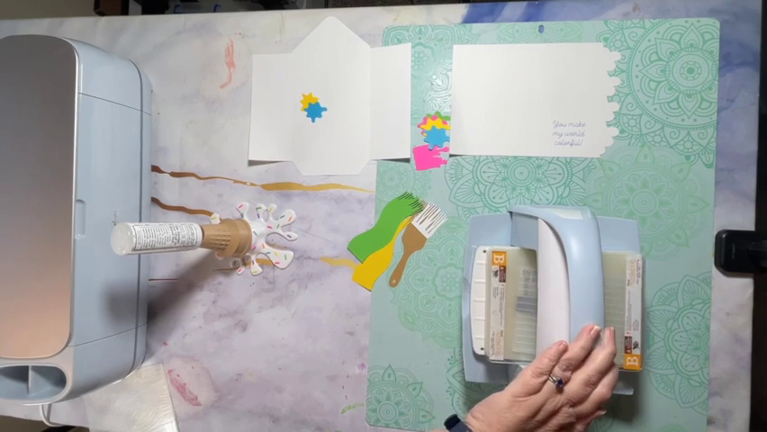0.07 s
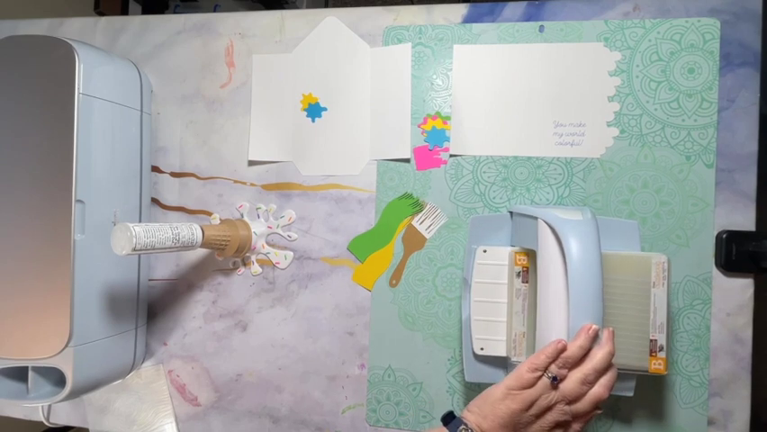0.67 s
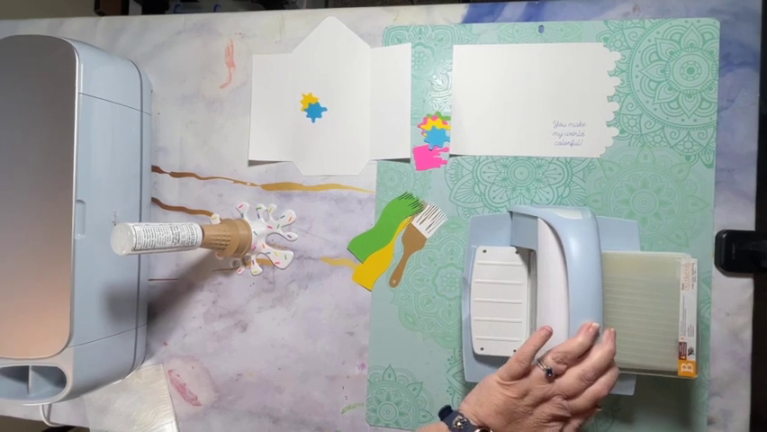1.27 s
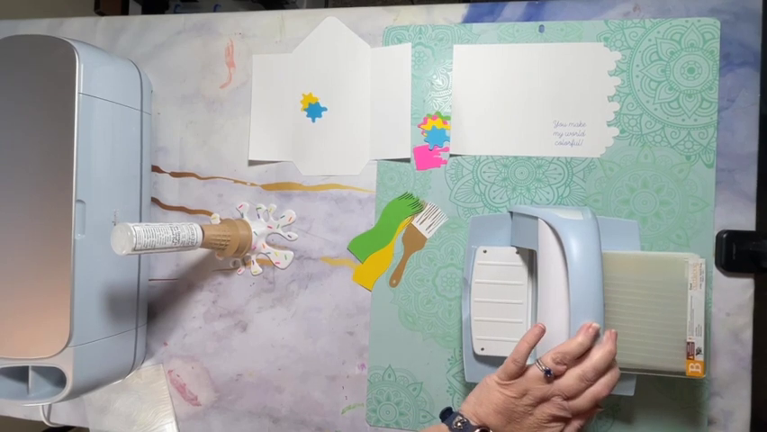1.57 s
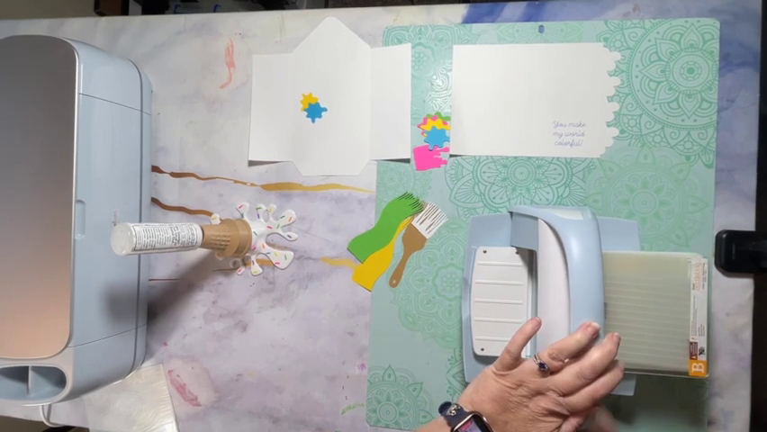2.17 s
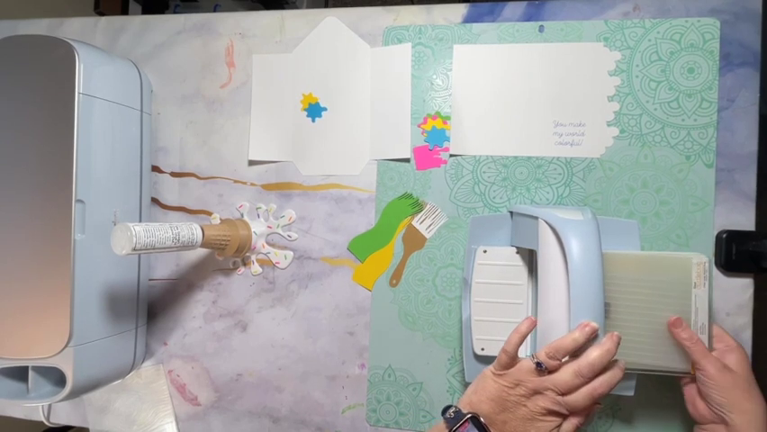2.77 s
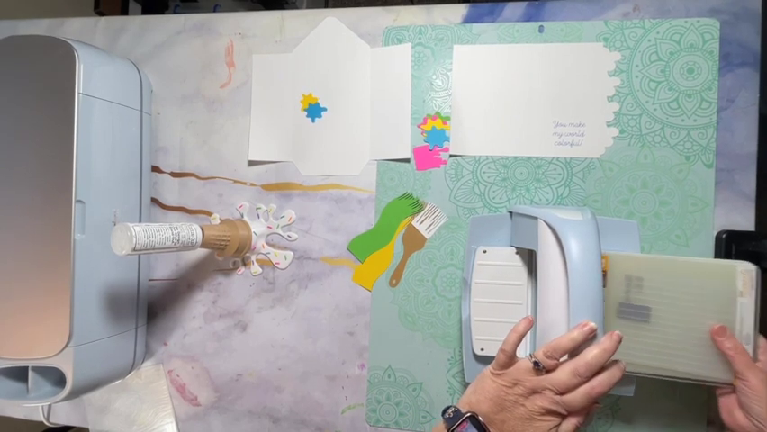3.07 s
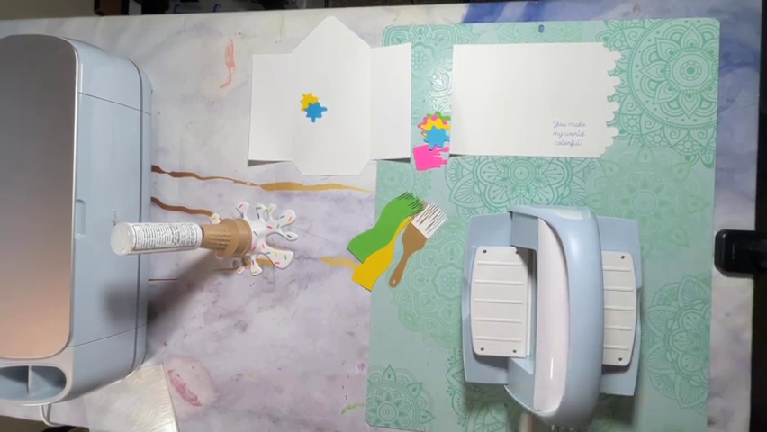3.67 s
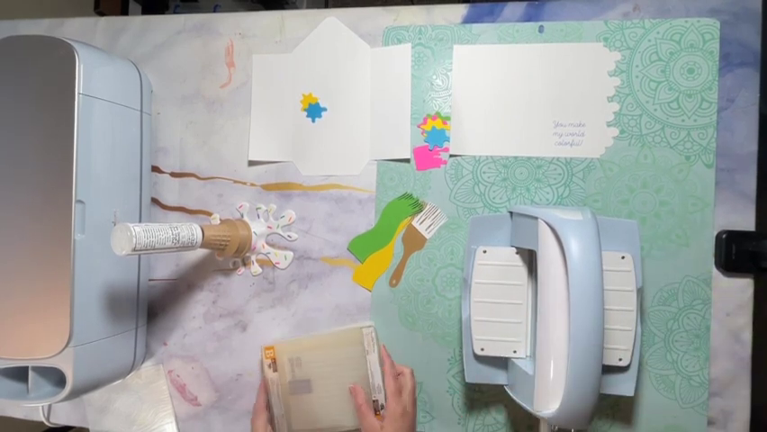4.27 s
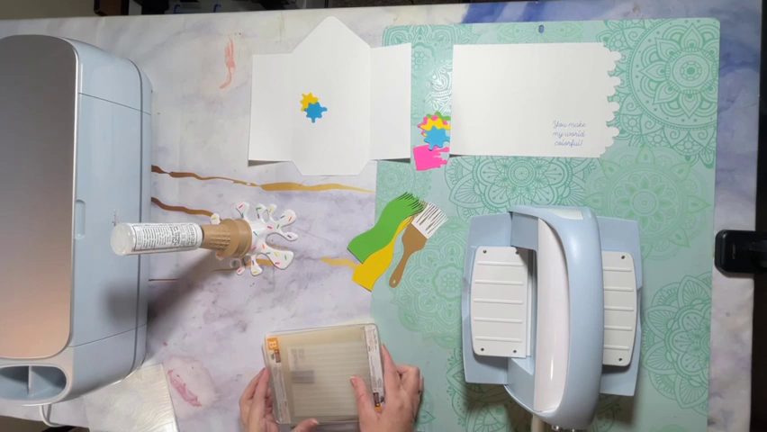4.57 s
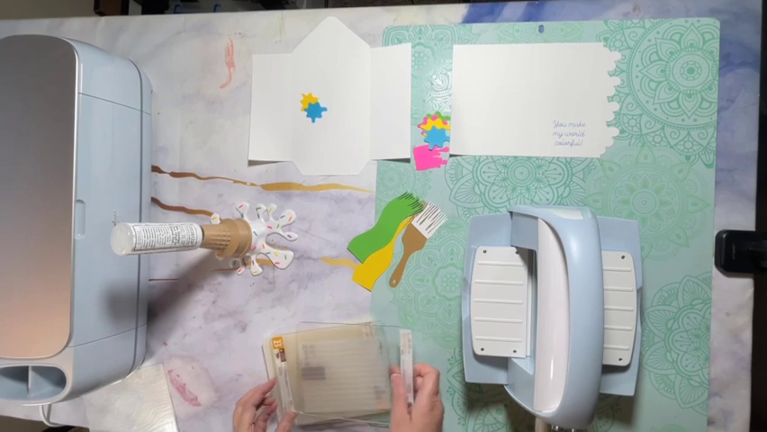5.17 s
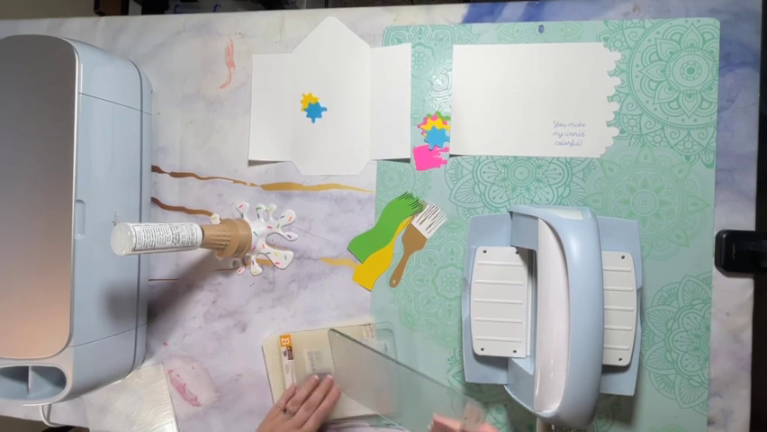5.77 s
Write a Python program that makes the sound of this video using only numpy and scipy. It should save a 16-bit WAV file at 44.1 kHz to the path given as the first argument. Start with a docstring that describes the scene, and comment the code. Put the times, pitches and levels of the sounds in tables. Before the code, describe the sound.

A hand-cranked embossing machine grinds softly and ticks as a stack of plastic plates feeds through its rollers. The gears knock several times as the load lets go. The stack scrapes and bumps off a hollow tray, then lands on a craft table with a loud clack and a low boom. Faint taps and plastic sliding follow. The sounds are picked up by an overhead stereo microphone in a small, quiet room.

```python
"""A hand-cranked embossing machine on a craft table in a small room, stereo microphone overhead.
Its rollers grind and tick as a stack of plastic plates feeds through; the gears knock as it comes free.
The stack is pulled off the hollow tray and dropped on the table, which booms; its top plate slides off.
Blows and the tiny slips of friction ring each body's modes, and a short room tail follows the blows."""
import sys
import numpy as np
from scipy import signal
from scipy.fft import rfft, irfft, next_fast_len
from scipy.io import wavfile
from scipy.ndimage import uniform_filter1d

SR = 44100
rng = np.random.default_rng(int(sys.argv[2]) if len(sys.argv) > 2 else 0)


def dump(signal):
    """Clip the signal to [-1, 1] and save it as 16-bit WAV at the path in sys.argv[1]."""
    limited = np.clip(np.atleast_2d(signal).T, -1, 1)
    pcm = np.round(limited * 32767).astype(np.int16)
    wavfile.write(sys.argv[1], SR, pcm)


N = 266231
RING_TIME = np.arange(int(.55 * SR)) / SR

# Contacts: start_s, knock_db, then relative to the knock: body_db, crack_db, tick_db
ROLLER_TICKS = [(0.022, -35, -14, -25, -20), (0.039, -49.5, -24, 16.5, 3.5), (0.081, -50, -10, 5.5, -12),
                (0.215, -49, -3, 2, -9), (0.246, -39, -5, -8, -19), (0.522, -37.5, -14, -14, -14),
                (0.736, -52.5, -12, 13, -1), (0.751, -37, -10, -1, -11), (0.969, -30, -10, -15, -34),
                (1.148, -37, -14, -18, -27), (1.183, -33, -15, -5.5, -14), (1.217, -36, -23, 0.5, -10),
                (1.222, -26.5, -5, -11, -12.5), (1.273, -47.5, -11, 9, 2), (1.285, -35, -1, -3, -14)]
GEAR_KNOCKS = [(1.398, -26.5, -18.5, -11.5, -13.5), (1.404, -23, -13.5, -16, -29),
               (1.635, -29, -11, -17.5, -21.5), (1.727, -42, -8, -16, -33), (1.763, -41.5, -3, -9, -38),
               (1.775, -24.5, -13.5, -8, -21.5), (1.977, -24, -13, -16.5, -15.5), (2.106, -46, -27, 3, -16)]
FINGER_TAPS = [(2.485, -62, 12, 0, 6.5), (2.636, -62, 4, 5, -6), (3.513, -63, 9.5, -10, 6),
               (3.64, -59.5, -15, 4.5, 7), (3.693, -56, -6, -8, -14), (3.741, -56.5, -11, -1, -21),
               (3.916, -57.5, -24, 2, -2), (3.932, -61, -1, 10, -20), (4.03, -66, -17, 4, 8.5),
               (4.216, -54.5, -15, 3, -26), (4.841, -45, -10.5, -7, -11.5), (5.197, -57, 12, -3, -20),
               (5.423, -55.5, -8, -1, -4.5), (5.449, -48, -16, -5, -11), (5.465, -53.5, 4, 7.5, 10.5),
               (5.701, -61.5, 4, 11.5, 13.5)]
SCUFFS = [(2.583, -54, -15, -8, -6.5), (3.322, -54.5, -8, -8, -19), (3.638, -50, -1.5, -23, -22),
          (3.686, -51.5, -18, -23, -29), (3.93, -49, -35, -15, -22), (4.207, -49, -8, -11, -27),
          (4.451, -35.5, 4, -0.5, -14.5), (4.83, -52.5, -17, -4, -9.5), (4.99, -58, -3.5, 0.5, -13),
          (5.16, -58.5, -16, 5, -11), (5.972, -59.5, 2, 7.5, 7)]
TRAY_KNOCKS = [(2.651, -33, -4, -10.5, -25), (2.703, -56, 7, -3, -6), (2.757, -34, -25, 2, -6),
               (2.761, -29.5, -2, -24, -4.5), (2.961, -27.5, -7.5, -2, -14.5),
               (2.974, -38.5, 3, -0.5, -3.5), (2.997, -37, -4, -15, -9), (3.013, -48, 1.5, -28, -12),
               (3.247, -58, 1.5, -4.5, -5), (3.327, -48.5, -8.5, -9, -7), (3.392, -46.5, -3, -10.5, -22)]
PLATE_CLACKS = [(4.462, -21.5, 4.5, -9.5, -30), (4.507, -8, -18.5, -5, -31.5), (4.629, -32.5, 6, 0, -3.5)]
# Weight landing on the table top: start_s, thump_db, then relative to the thump: boom_db, thud_db
THUMPS = [(0.54, -51.5, -14, -1), (0.975, -54.5, -18, -11), (2.775, -54.5, 9.5, -19),
          (2.968, -52, -4.5, -9), (4.461, -13.5, -14, -12), (4.508, -7.5, -10.5, -13),
          (4.539, -14.5, -14, -8), (4.632, -10, -10.5, -5.5), (4.651, -37, -5, -11.5),
          (5.196, -42, -9, -9.5), (5.708, -51, 10, -31)]
# Bands a blow excites, one per level column above: low_hz, high_hz, burst_t60_s, tail_db, room_t60_s
CONTACT_BANDS = [(633, 1438, 0.055, -8, 0.21), (170, 638, 0.097, -8, 0.43),
                 (1714, 3650, 0.011, -14.5, 0.25), (4200, 16000, 0.018, -10.5, 0.22)]
THUMP_BANDS = [(112, 250, 0.05, -15, 0.082), (58.6, 116, 0.15, -20.5, 0.4), (260, 460, 0.23, -15.5, 0.25)]
# Light touches that only set a body ringing: start_s, level_db, t60_factor
STACK_BUMPS = [(0.024, -42.5, 1), (3.373, -54.5, 0.49), (3.393, -49, 1), (4.218, -64, 0.93)]
EDGE_SLIPS = [(1.183, -64, 2), (2.758, -42, 0.9), (2.765, -48, 0.84)]
EDGE_SNAPS = [(1.184, -46.5, 0.96), (1.222, -49, .7), (1.273, -45, 0.86)]
TOP_PLATE_RATTLES = [(4.464, -49, 0.73), (4.509, -40, 1), (4.631, -44, 1), (4.648, -42, 0.47),
                     (4.678, -46.5, 0.97)]
# The stack dropping on the hollow tray: start_s, level_db, pitch_hz
TRAY_DROPS = [(2.763, -34.5, 411), (3.012, -37.5, 436.5)]
# Effort on the crank, as the level of the grinding: time_s, level_db
CRANK_EFFORT = [(0.0, -55), (0.39, -63.5), (0.45, -58.5), (1.08, -56.5), (1.31, -57.5), (1.45, -67),
                (1.72, -64), (1.92, -62), (2.12, -60.5), (2.3, -100)]
# Pressure on the machine's frame and on the table top: start_s, length_s, level_db
SQUEEZE = (0.57, 0.88, -68)
HANDS_ON_TABLE = [(0, 3.55, -70.5), (4.467, 2.1, -60)]
# Plastic sliding: start_s, length_s, rub_db, then relative to the rub: hiss_db, grit_db
STROKES = [(2.564, 0.45, -55, -15, -2), (2.919, 0.17, -49.5, -27.5, -34), (3.228, 0.29, -61, -22, -26),
           (3.492, 0.24, -68.5, -5, -4), (3.792, 0.52, -89, 15, 6), (4.382, 0.14, -70, 7, -4.5),
           (4.467, 0.2, -48, -9, -7), (4.949, 0.1, -58.5, -8, -1.5), (5.059, 0.092, -72.5, 5.5, -8),
           (5.131, 0.045, -62, -1, 8.5), (5.278, 0.052, -64, -7.5, -2.5), (5.545, 0.021, -72, 1.5, -7.5),
           (5.709, 0.12, -80, 16, -5), (5.814, 0.049, -70, 8, -6), (5.946, 0.17, -61.5, 6, -10)]
# The top plate's squeak: start_s, length_s, pitch_hz, level_db
SQUEAK = (5.565, .085, 921, -68)

# Modes of each body: pitch_hz, level_db, t60_s
ROLLER_MODES = [(200.4, -18, 0.24), (234, -9, 0.11), (455, -1, 0.041), (670, 2.5, 0.014), (798, -6, 0.19),
                (927, -4.5, 0.19), (990, -10, 0.087), (1084, -20.5, 0.026), (1559, -0.5, 0.051),
                (2010, -6, 0.034)]
GRIT_MODES = [(1140, -5, .06), (1600, -5, .04), (1710, 1, 0.06), (1830, -2, 0.045), (2350, -4, .04),
              (4110, -12, 0.015), (6130, -7, .012)]   # excited by grit between two plates
FRAME_MODES = [(442.2, -4, 0.45), (468, -5.5, 0.35)]
TABLE_MODES = [(65, -12, 0.45), (113, -4, 0.25), (129, -2, 0.24), (159.5, 3, 0.23), (192.5, 0, 0.23),
               (221, -9, .22), (240, -7, 0.16), (269, -11, .22), (288, -8, 0.17), (354, -5, .19),
               (382, -9, .27)]
STACK_MODES = [(711, -13, .4), (908, 0, .16), (1114, -13, .13), (1787, -18, .15)]
EDGE_MODES = [(11500, 0, .05), (11660, -3, .05), (11950, -7, .09)]
SNAP_MODES = [(689, -1, .12), (1520, 0, .1), (1706, 0, .13), (1950, -3, .1), (3025, -9, .13),
              (5350, -14, .07), (6200, -15, .07)]
GEAR_MODES = [(405.6, 0, 0.26), (500, -9, 0.3), (580, -6, 0.3), (671, -3, 0.27), (724, 1, 0.25),
              (808, 6, 0.19), (867, 17, 0.04), (1105, -3, 0.16), (1194, -4, 0.15), (1303, -10, 0.15),
              (1374, -11, 0.11), (1480, -11, 0.11)]
CASING_MODES = [(1650, 1, .15), (1735, -2, .2), (1863, 4, .19), (2062, -8, .26), (2342, -1, .19),
                (2830, -9, .23), (3542, -5, .15), (3801, -2, .15), (4050, -6, .18), (4680, -11, .22),
                (5380, -8, .22), (6562, -10, .25), (6686, -8, .22), (7224, -7, .15), (7450, -9, .2)]
HELD_PLATE_MODES = [(720, 7, 0.031), (974.5, 7, 0.073), (1116, 4, 0.059), (1670, 6, 0.022),
                    (1850, 2.5, 0.025), (2030, -4, 0.12), (2190, -11, 0.26), (2898, -6, 0.055)]
TRAY_MODES = [(229, 3, 0.099), (322, 0, 0.45), (436.6, 8.5, 0.22), (550, -2, 0.36), (645, -3.5, 0.25),
              (742, 1.5, 0.22), (1080, 3, 0.15), (1168, 15.5, 0.026), (1460, 3, 0.07), (1670, 23.5, 0.021),
              (1833, 1, 0.085), (2020, 6.5, 0.13), (2290, 7, 0.06)]
PLATE_MODES = [(528, -11, .22), (620, -7, 0.16), (735, -8, .16), (775, 1, .24), (821, -3, .19),
               (916, 1, .15), (1010, -5, .1), (1136, -5, 0.13), (1163, -7, .13), (1247, -7, 0.14),
               (1486, -13, .17), (1610, -11, .16), (1726, -7, 0.13), (1836, -6, .13), (2263, -10, .13),
               (2891, -11, .16)]
TOP_PLATE_MODES = [(2772, -2, .17), (2869, 0, .19), (2935, -2, .18), (3050, -6, .16), (3321, -3, .28),
                   (3768, -9, .22), (5136, -7, .22), (5330, -7, .17), (5560, -8, .15), (6212, -12, .2),
                   (6690, -18, .4), (8059, -14, .19), (9082, -12, .25), (9300, -13, .16)]
# Spectra of each body's dense, overlapping modes: frequency_hz, density_db
ROLLER_COLOUR = [(71, -60), (120, -61), (348, -13.5), (445, 3.5), (524, -12.5), (684, 4), (949, 5),
                 (1140, 3), (1520, -6), (6240, -20), (10400, -41.5), (12500, -19), (16000, -59)]
TABLE_COLOUR = [(21, -48.5), (35, -18), (81, -9), (112, 6), (156, -0.5), (260, -10.5), (347, -18.5),
                (440, -21), (700, -31.5), (910, -33), (1540, -120)]
GEAR_COLOUR = [(120, -10.5), (260, -19), (420, -6.5), (800, -13), (1150, -18.5), (2000, -27), (3300, -38.5),
               (4000, -31.5), (4700, -27), (7000, -7.5), (10000, -10.5), (13000, -12), (16000, -28)]
HELD_PLATE_COLOUR = [(150, -11.5), (400, -14), (650, -12), (1050, 2.5), (1400, -4), (1800, -7.5),
                     (3000, -10), (5000, -6.5), (8000, -11), (13000, -9), (16000, -19.5)]
TRAY_COLOUR = [(120, -12.5), (290, -16), (420, -11), (600, -14.5), (1000, -11), (1350, -17), (1750, -17),
               (2100, -16), (2550, -11.5), (3050, -19), (3550, -27), (4600, -31), (8000, -42), (12000, -67),
               (16000, -66)]
PLATE_COLOUR = [(150, -7), (300, -5), (500, -9), (800, -22.5), (1130, -18.5), (1350, -33.5), (1800, -32.5),
                (2450, -31), (3000, -30), (4300, -36), (5400, -24.5), (6300, -26), (8200, -41.5),
                (10000, -46), (16000, -64.5)]
# Spectra of friction, table rumble and room tone: frequency_hz, density_db
GRIND_HISS_COLOUR = [(2000, 7.5), (2800, -1), (5000, -5.5), (7500, -7), (10000, -15), (16000, -12)]
RUB_COLOUR = [(160, -35.5), (280, 1), (423, -1), (587, -3), (823, -3.5), (915, -16), (1230, -11),
              (1430, -4.5), (1710, -19), (3500, -24.5), (4550, -55.5), (7700, -120)]
SLIDE_HISS_COLOUR = [(2000, -5), (3200, 2), (5000, 1), (7500, 2.5), (10000, 1.5), (13000, 2.5),
                     (16000, -15)]
RUMBLE_COLOUR = [(21, -48), (35, -18.5), (54, -2.5), (107, -0.5), (193, -3.5), (320, -14), (371, -13.5),
                 (450, -11), (580, -43.5), (990, -120)]
ROOM_COLOUR = [(15, -31.5), (25, -19), (64, 6), (190, -1), (560, -2), (863, -7), (1400, -8), (2690, -19.5),
               (6920, -23.5), (10100, -50.5), (12500, -16.5), (16000, -51.5)]
# Where things stand under the microphone: frequency_hz, left_minus_right_db
MACHINE_PAN = [(60, -4.5), (150, -1.5), (380, -6.5), (950, -1.5), (2380, 0), (5980, -1), (15000, 0)]
TABLE_PAN = [(60, -1.5), (120, -2), (240, -4), (480, -6), (950, 1.5), (1890, 4), (3770, -5), (7520, 11),
             (15000, 9.5)]
# How far the right microphone port lags the left: frequency_hz, lag_rad
PORT_LAG = [(0, 0), (300, 0.22), (700, 1.1), (1100, 0.25), (2100, 0.2), (3400, 1.2), (6100, 0.8),
            (8300, 2.1), (9900, 3.1), (11300, 3.2), (12400, 4.0), (13700, 6.2), (16000, 6.3)]


def from_db(db):
    """Decibels to gain."""
    return 10 ** (np.asarray(db) / 20)


def rms_one(x):
    """Scale to rms 1."""
    return x / np.sqrt(np.mean(x ** 2) + 1e-20)


def peak_one(x):
    """Scale so that the loudest 5 ms have rms 1."""
    power = uniform_filter1d(np.mean(np.atleast_2d(x) ** 2, axis=0), size=SR // 200)
    return x / np.sqrt(power.max() + 1e-20)


def at_hz(points, hz):
    """Read a table on a log-frequency axis."""
    points_hz, values = np.transpose(points)
    return np.interp(np.log(np.maximum(hz, 1)), np.log(np.maximum(points_hz, 1)), values)


def band(x, low_hz, high_hz):
    """Causal band-pass."""
    return signal.sosfilt(signal.butter(3, [low_hz, high_hz], "band", fs=SR, output="sos"), x + 1e-18)


def decay(t60):
    """Exponential fall of 60 dB in t60 seconds."""
    return 1000 ** (-RING_TIME / t60)


def panned(pan, hz):
    """Left and right gains at these frequencies."""
    return from_db(np.array([[.5], [-.5]]) * at_hz(pan, hz))


def place(track, start_s, sound):
    """Add a stereo sound to the track."""
    span = track[:, round(start_s * SR):][:, :sound.shape[1]]
    span += sound[:, :span.shape[1]]


def noise(colour, pan, size=N, spread=0.62):
    """Coloured stereo noise, rms 1; long waves and the highest treble are alike at both ports."""
    fft_size = next_fast_len(size, True)
    hz = np.fft.rfftfreq(fft_size, 1 / SR)
    mid, side = rfft(rng.standard_normal((2, fft_size)))
    side *= spread * hz / np.hypot(hz, 750) / np.hypot(1, (hz / 9000) ** 2)
    spectrum = np.array([mid + side, mid - side]) * panned(pan, hz) * from_db(at_hz(colour, hz))
    return rms_one(irfft(spectrum, fft_size)[:, :size])


def wander(rate_hz, depth_db):
    """A gain that wanders at random, rms 1."""
    knots = rng.standard_normal(int(N / SR * rate_hz) + 2)
    curve = np.interp(np.arange(N) / SR * rate_hz, np.arange(len(knots)), knots)
    return rms_one(from_db(depth_db * curve))


def gesture(start, length, attack_s, release_s, growth_db=0):
    """Gain of one movement: it sets in, ramps from -2 * growth_db to -growth_db, then dies away."""
    t = np.arange(N) / SR - start
    growth = from_db(growth_db * (np.clip(t / length, 0, 1) - 2))
    return np.clip(t / attack_s, 0, 1) * growth * np.exp(-np.maximum(t - length, 0) / release_s)


def ringing(modes, pan, skew):
    """A body's modes after one tap; the left port leads by skew radians."""
    lead = np.array([[.5], [-.5]]) * skew
    return sum(from_db(db) * panned(pan, hz) * decay(t60) * np.sin(2 * np.pi * hz * RING_TIME + lead)
               for hz, db, t60 in modes)


def rubbed(modes, slips_per_s, spread_db, rough_db):
    """A body kept ringing by the tiny, uneven slips of friction."""
    sizes = from_db(spread_db * np.minimum(rng.exponential(1, N), 4)) * rng.choice([-1, 1], N)
    slips = sizes * (rng.random(N) < slips_per_s / SR) * wander(35, rough_db)
    return signal.oaconvolve(slips[None], ringing(modes, MACHINE_PAN, skew=0.46), axes=1)[:, :N]


def touches(events, modes, pan, skew, scatter_db):
    """Light touches ring each mode with a strength of its own; pressure shortens the ring."""
    out = np.zeros((2, N))
    for start, level_db, t60_factor in events:
        struck = [(hz, db + scatter_db * rng.standard_normal(), t60 * t60_factor)
                  for hz, db, t60 in modes]
        place(out, start, from_db(level_db) * peak_one(ringing(struck, pan, skew)))
    return out


def blows(events, modes, colour, pan, skew, modes_db, click_db, room_db, swell_cycles,
          contact_s=0, click_hz=13000, burst_share=1, bands=CONTACT_BANDS):
    """Each blow is a contact click, the body's modes, a burst of dense modes and the room's tail."""
    out = np.zeros((2, N))
    tone = ringing(modes, pan, skew)
    impulse = signal.unit_impulse(len(RING_TIME))
    contact = signal.sosfilt(signal.butter(2, click_hz, fs=SR, output="sos"), impulse)
    highest_hz = max(mode[0] for mode in modes)
    dense = np.array([noise(colour, pan, len(RING_TIME)) for _ in events])
    for k, (low_hz, high_hz, burst_t60, tail_db, room_t60) in enumerate(bands):
        # Low notes and soft contacts build slowly.
        swell_s = swell_cycles / np.sqrt(low_hz * high_hz) + contact_s
        swell = 1 - np.exp(-RING_TIME / swell_s)
        click = from_db(click_db) * peak_one(band(contact, low_hz, high_hz))
        ring = from_db(modes_db) * peak_one(band(tone * swell, low_hz, high_hz)) * (low_hz < highest_hz)
        room_tail = from_db(tail_db + room_db) * decay(room_t60)
        envelope = swell * np.hypot(decay(burst_t60 * burst_share), room_tail)
        bursts = band(dense * envelope, low_hz, high_hz)
        for (start, level_db, *relative_db), burst in zip(events, bursts):
            gain = from_db(level_db + [0, *relative_db][k])
            place(out, start, gain * peak_one(click + ring + peak_one(burst)))
    return out


def rollers():
    """Slips between rollers and plates shake the machine, chafe and hiss with the effort on the crank."""
    effort = from_db(np.interp(np.arange(N) / SR, *np.transpose(CRANK_EFFORT), right=-120))
    slips = rubbed(ROLLER_MODES, slips_per_s=370, spread_db=4.5, rough_db=9.5)
    slipping = from_db(-3.5) * rms_one(band(slips, 220, 3900))
    rolling = from_db(-5.5) * noise(ROLLER_COLOUR, MACHINE_PAN) * wander(50, 3.8)
    grit = rubbed(GRIT_MODES, slips_per_s=300, spread_db=4, rough_db=4)
    chafing = from_db(-9) * rms_one(band(grit, 1400, 2600))
    hissing = from_db(-7.5) * noise(GRIND_HISS_COLOUR, MACHINE_PAN) * wander(140, 0.78)
    return effort * (slipping + rolling + chafing + hissing)


def table_rumble():
    """The table top rumbles while the hands crank the machine or work on the stack."""
    leaning = sum(from_db(db) * gesture(start, length, attack_s=.03, release_s=.1)
                  for start, length, db in HANDS_ON_TABLE)
    return leaning * noise(RUMBLE_COLOUR, TABLE_PAN) * wander(32, 3.2)


def roller_ticks():
    """The rollers tick under load."""
    return from_db(-12) * blows(
        ROLLER_TICKS, ROLLER_MODES, ROLLER_COLOUR, MACHINE_PAN, skew=0.047,
        modes_db=-6, click_db=-30, room_db=0.5, swell_cycles=0.7, click_hz=5000, burst_share=0.96)


def stack():
    """The stack rings hollowly when bumped, pings as a hard edge slips and snaps out of the rollers."""
    bumps = touches(STACK_BUMPS, STACK_MODES, MACHINE_PAN, skew=0.2, scatter_db=1.5)
    pings = touches(EDGE_SLIPS, EDGE_MODES, MACHINE_PAN, skew=0.8, scatter_db=1.5)
    snaps = touches(EDGE_SNAPS, SNAP_MODES, MACHINE_PAN, skew=0.17, scatter_db=2.5)
    return bumps + pings + snaps


def table_thumps():
    """The table top booms as weight lands on it."""
    return from_db(-3) * blows(
        THUMPS, TABLE_MODES, TABLE_COLOUR, TABLE_PAN, skew=.05,
        modes_db=6, click_db=8, room_db=-3, swell_cycles=0.058, bands=THUMP_BANDS)


def frame_groan():
    """The frame groans as the thick of the stack is squeezed between the rollers."""
    start, length, level_db = SQUEEZE
    load = from_db(level_db) * gesture(start, length, attack_s=0.045, release_s=0.35, growth_db=-4)
    groan = rms_one(rubbed(FRAME_MODES, slips_per_s=240, spread_db=0.5, rough_db=3))
    return load * groan * wander(16, 3)


def gear_knocks():
    """The gears knock as the load lets go; the stiff train's burst dies sooner than a loose plate's."""
    return from_db(-2.5) * blows(
        GEAR_KNOCKS, GEAR_MODES, GEAR_COLOUR, MACHINE_PAN, skew=0.6,
        modes_db=-1, click_db=-15, room_db=-0.5, swell_cycles=1.13, burst_share=.75)


def casing():
    """Every gear or tray knock leaves the casing ringing, the louder the harder its crack."""
    events = [(start, knock_db + crack_db - 11.5, 1)
              for start, knock_db, _, crack_db, _ in GEAR_KNOCKS + TRAY_KNOCKS]
    return touches(events, CASING_MODES, MACHINE_PAN, skew=1, scatter_db=2)


def fingers():
    """Nails tap and fingers scuff on the plates, damped by the grip."""
    taps = blows(FINGER_TAPS, HELD_PLATE_MODES, HELD_PLATE_COLOUR, MACHINE_PAN, skew=0.37,
                 modes_db=-22, click_db=-0.5, room_db=4, swell_cycles=0.23, contact_s=0.00021)
    scuffs = blows(SCUFFS, HELD_PLATE_MODES, HELD_PLATE_COLOUR, MACHINE_PAN, skew=0.096,
                   modes_db=-3.5, click_db=-4.5, room_db=-7, swell_cycles=0.6, contact_s=0.023)
    return from_db(-8) * taps + from_db(-10) * scuffs


def sliding():
    """Plastic rubs, hisses and scrapes over tray, fingers and plates; each stroke gathers speed."""
    rub = hiss = grit = 0
    for start, length, rub_db, hiss_db, grit_db in STROKES:
        speed = gesture(start, length, attack_s=0.041, release_s=0.071, growth_db=5)
        rub += from_db(rub_db) * speed
        hiss += from_db(rub_db + hiss_db) * speed
        grit += from_db(rub_db + grit_db) * speed
    scraping = rms_one(rubbed(GRIT_MODES, slips_per_s=260, spread_db=5.5, rough_db=4))
    singing = from_db(-3) * rms_one(rubbed(HELD_PLATE_MODES, slips_per_s=450, spread_db=4, rough_db=4))
    rubbing = from_db(-1) * noise(RUB_COLOUR, MACHINE_PAN) * wander(99, 2.4)
    hissing = from_db(6.5) * wander(110, 2.1) * noise(SLIDE_HISS_COLOUR, MACHINE_PAN, spread=0.036)
    return rub * (singing + rubbing) + hiss * hissing + grit * scraping


def tray_knocks():
    """The stack bumps over the tray as it is pulled off."""
    return from_db(-5) * blows(
        TRAY_KNOCKS, TRAY_MODES, TRAY_COLOUR, MACHINE_PAN, skew=0.073,
        modes_db=0, click_db=-8, room_db=3, swell_cycles=0.27, click_hz=5550)


def tray_hollow(build_s=0.01, t60_s=.11):
    """The hollow tray answers each drop with one low note, higher once less weight rests on it."""
    out = np.zeros((2, N))
    swell = 1 - np.exp(-RING_TIME / build_s)
    for start, level_db, hz in TRAY_DROPS:
        note = swell * ringing([(hz, 0, t60_s)], MACHINE_PAN, skew=0.1)
        place(out, start, from_db(level_db) * peak_one(note))
    return out


def plate_drop():
    """The stack lands edge first, slaps flat and rocks once more; the loose top plate rattles on."""
    clacks = blows(PLATE_CLACKS, PLATE_MODES, PLATE_COLOUR, TABLE_PAN, skew=-0.36,
                   modes_db=-5.5, click_db=5, room_db=7.5, swell_cycles=0.4, click_hz=4990)
    # Broad faces meet with little treble.
    clacks = signal.sosfilt(signal.butter(3, 7800, fs=SR, output="sos"), clacks)
    rattle = touches(TOP_PLATE_RATTLES, TOP_PLATE_MODES, TABLE_PAN, skew=0.082, scatter_db=-1.5)
    return from_db(-4) * clacks + rattle


def squeak():
    """The top plate sticks and slips as it is lifted: a faint tone that swells and fades."""
    start, length, hz, level_db = SQUEAK
    progress = np.clip((np.arange(N) / SR - start) / length, 0, 1)
    phase = 2 * np.pi * hz * np.cumsum(wander(80, 0.055)) / SR
    return from_db(level_db) * np.sin(np.pi * progress) * np.sin(phase) * wander(60, 1.8)


def scene():
    """All sources over quiet room tone; sound reaches the right port a moment after the left."""
    room_tone = from_db(-70.5) * noise(ROOM_COLOUR, MACHINE_PAN)
    machine = rollers() + roller_ticks() + frame_groan() + gear_knocks() + casing()
    table = table_rumble() + table_thumps()
    tray = tray_knocks() + tray_hollow()
    plates = stack() + fingers() + sliding() + plate_drop() + squeak()
    left, right = room_tone + machine + table + tray + plates
    fft_size = next_fast_len(N + SR // 100, True)
    lag_rad = np.interp(np.fft.rfftfreq(fft_size, 1 / SR), *np.transpose(PORT_LAG))
    late_right = irfft(rfft(right, fft_size) * np.exp(-1j * lag_rad), fft_size)[:N]
    return np.array([left, late_right])


def record(dry):
    """The microphone signal is cut steeply above 15.9 kHz."""
    return signal.sosfilt(signal.ellip(10, .2, 80, 15900, fs=SR, output="sos"), dry)


dry = scene()
out = record(dry)
dump(out)
```